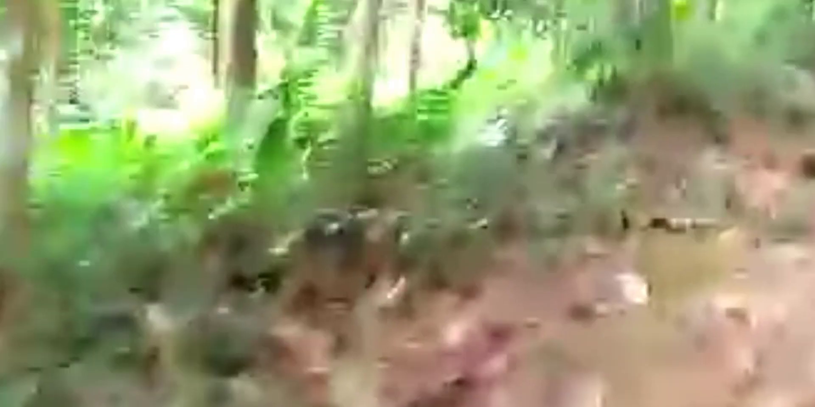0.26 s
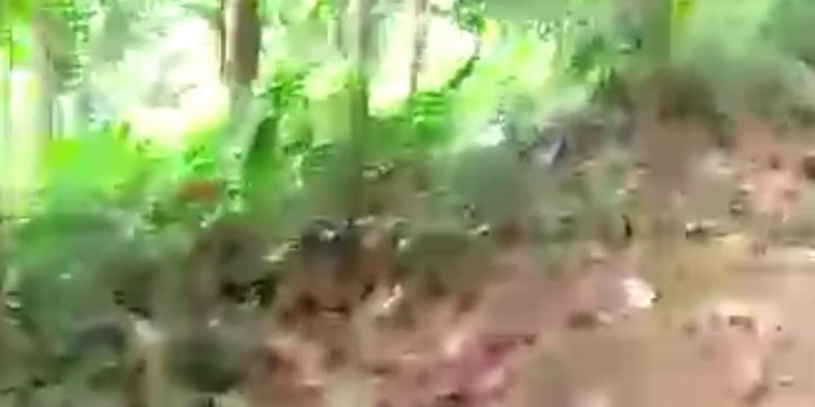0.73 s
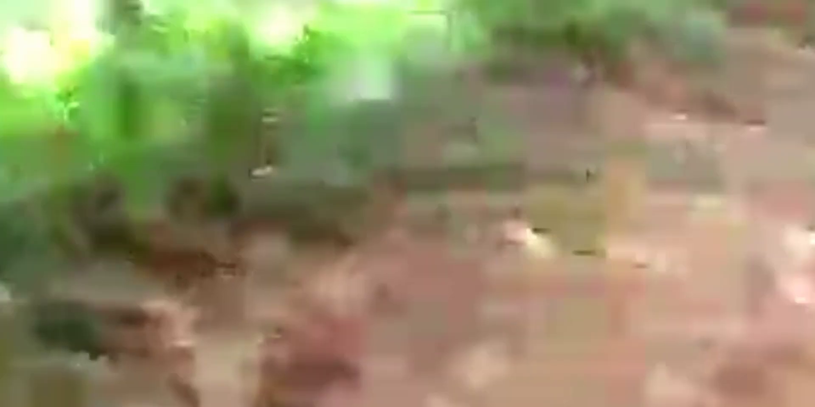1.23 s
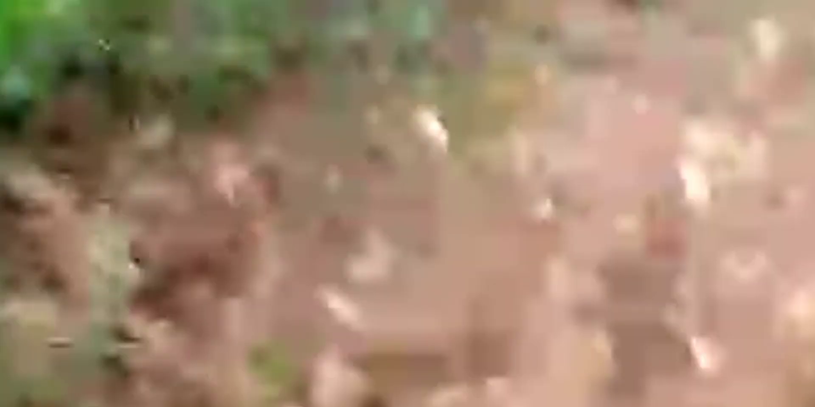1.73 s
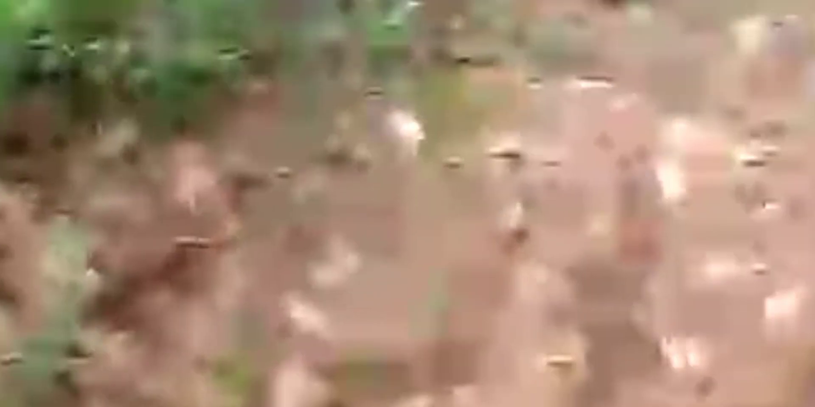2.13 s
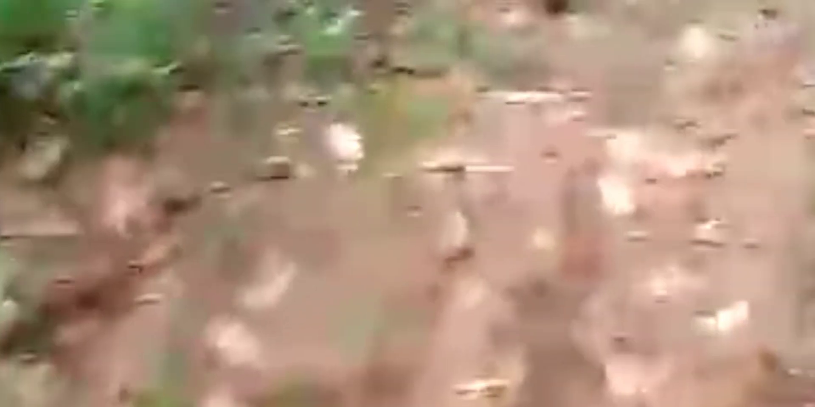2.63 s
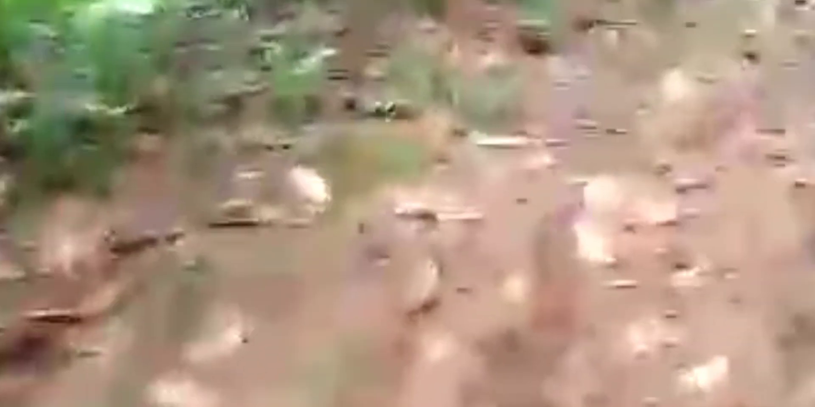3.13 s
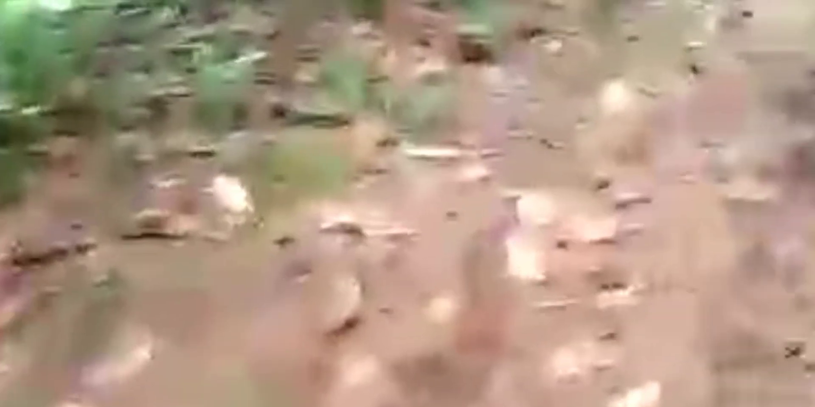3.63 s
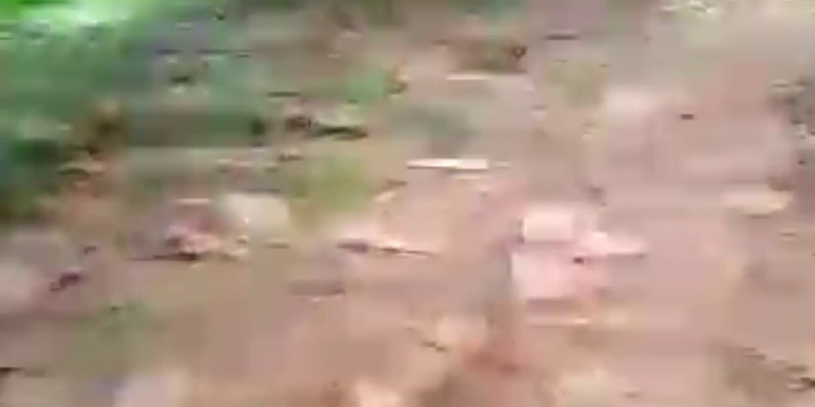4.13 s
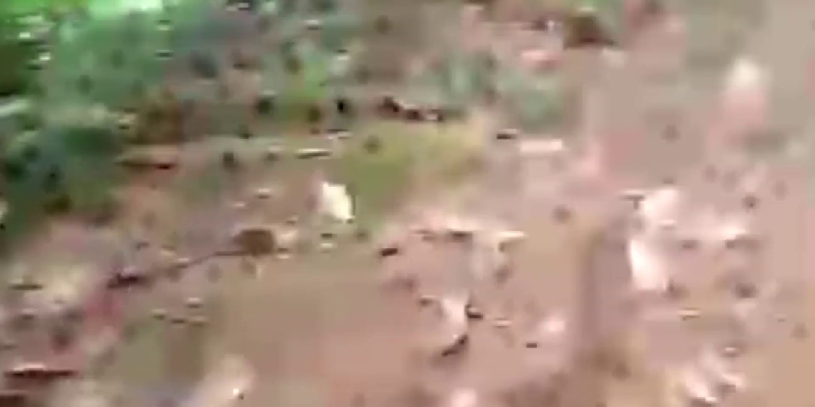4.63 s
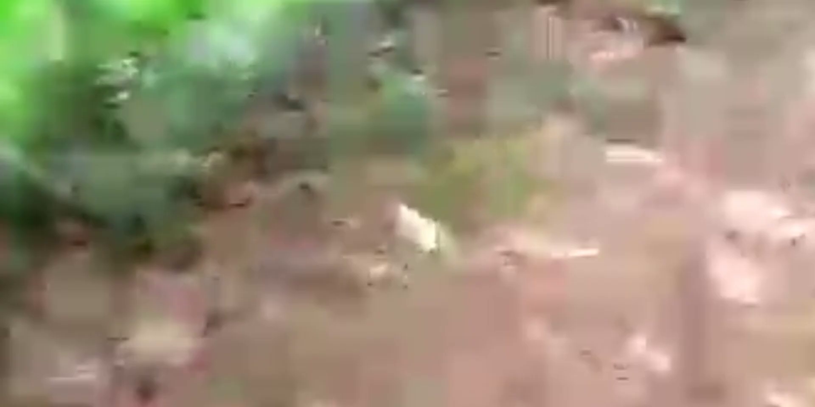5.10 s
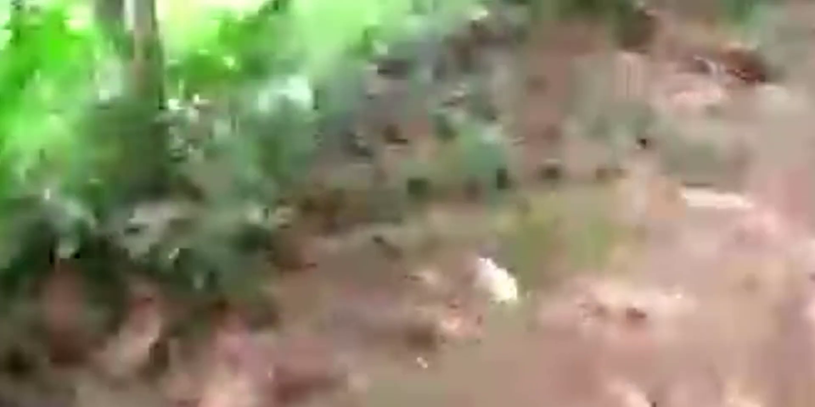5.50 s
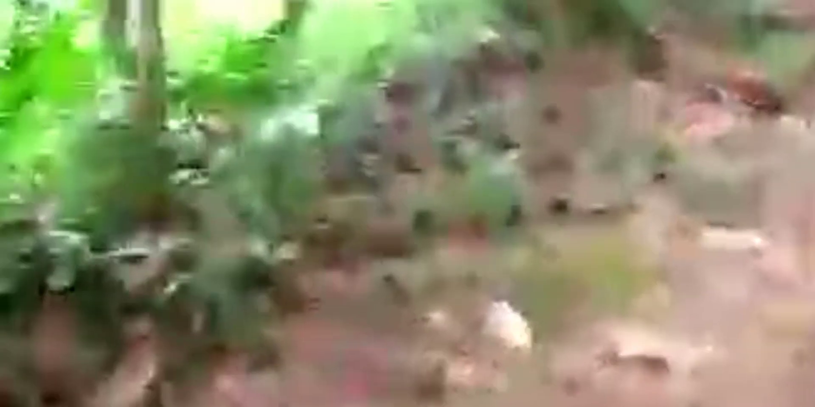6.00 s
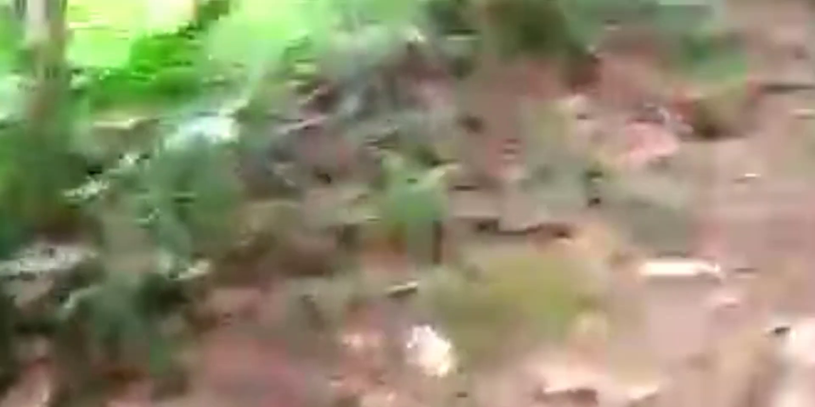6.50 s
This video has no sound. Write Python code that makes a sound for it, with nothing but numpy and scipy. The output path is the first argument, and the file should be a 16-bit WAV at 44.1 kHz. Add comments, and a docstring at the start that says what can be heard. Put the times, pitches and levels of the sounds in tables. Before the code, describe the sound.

A bird close on the left slides a loud, long whistle downward. Another on the right repeats short rising whistles that grow louder. Then the first bird gives its falling whistle again as a rapid trill starts on the left. Small birds whistle, chip and chirr further off throughout. The calls echo lightly among the trees of a garden slope, in stereo, over a soft distant rumble.

```python
"""A bird close on the left slides a long whistle downward, and later does it again.
One on the right repeats rising whistles, growing louder; another on the left trills.
Further off, small birds whistle, chip and chirr, and one slides down far away.
Each call is a gliding tone, roughened by noise where the voice is hoarse. Trunks and a bank on a wooded
garden slope echo it all over a soft distant rumble, heard by two microphones a head apart."""
import sys
import numpy as np
from scipy import signal
from scipy.fft import rfft, irfft
from scipy.io import wavfile
from scipy.ndimage import uniform_filter1d

SR = 44100
rng = np.random.default_rng(int(sys.argv[2]) if len(sys.argv) > 2 else 0)


def transcribe(signal):
    """Save signal, clipped to [-1, 1], as a 16-bit WAV file at the path in sys.argv[1]."""
    frames = np.atleast_2d(signal).T
    limited = np.clip(frames, -1, 1)
    pcm = np.round(limited * 32767).astype(np.int16)
    wavfile.write(sys.argv[1], SR, pcm)


N = 297675
LEAD = SR // 2  # extra samples at the front, for calls that begin before time zero


def undb(db):
    """Turn decibels into a factor to multiply a sound by."""
    return 10 ** (np.asarray(db) / 20)


def on_log(hz, table):
    """Read between the rows of a (pitch_hz, value) table, with octaves evenly spaced."""
    pitches, values = np.transpose(table)
    return np.interp(np.log(np.maximum(hz, 1)), np.log(pitches), values)


def phase_of(hz):
    """Add up a changing pitch into the angle of its wave, in radians."""
    return 2 * np.pi * np.cumsum(hz) / SR


def blur(n, width_hz):
    """Complex noise of strength 1; multiplying a tone by it smears the pitch over width_hz."""
    noise = rng.standard_normal(n + 2000) + 1j * rng.standard_normal(n + 2000)
    lowpass = signal.butter(2, np.clip(width_hz / 2, 3, 5000), fs=SR, output="sos")
    noise = signal.sosfilt(lowpass, noise)[2000:]  # skip the part where the filter settles
    return noise / np.sqrt(np.mean(abs(noise) ** 2))


def place(bus, start_s, sound, pan_db, wood_db, lean=0.13, ear_lag_s=.0008):
    """Send a call to the microphones (rows 0, 1), the nearer one first, and into the wood (rows 2, 3)."""
    lag_s = ear_lag_s * np.clip(np.mean(pan_db) / 4, -1, 1) / 2  # pan_db is left minus right
    lean_db = lean * pan_db / 2  # the wood rings a little louder on the bird's side
    paths = [(-lag_s, pan_db / 2), (lag_s, -pan_db / 2), (0, wood_db + lean_db), (0, wood_db - lean_db)]
    for row, (shift_s, db) in enumerate(paths):
        i = LEAD + int((start_s + shift_s) * SR)
        part = (sound * undb(db))[:bus.shape[1] - i]
        bus[row, i:i + len(part)] += part


def rumble_and_leaves(level_db=-54, flicker_db=.8):
    """Distant rumble and leaf hiss: alike left and right in the bass, drifting a little band by band."""
    # How strong the noise is from bass to treble: pitch_hz, relative_db
    noise_shape = [(12, -77.5), (25, -18.5), (58, -11), (170, 0), (260, 0), (420, -5), (600, -5),
                   (1000, -8), (1860, -10), (2900, -13), (4500, -18), (7000, -28.5), (10000, -31.5),
                   (16000, -29.5)]
    # How alike the two sides are: pitch_hz, likeness (0 unrelated, 1 the same)
    side_likeness = [(60, 0.93), (130, 0.93), (290, 0.67), (640, 0), (1400, 0.034)]
    hz = np.fft.rfftfreq(N, 1 / SR)
    alike = np.clip(on_log(hz, side_likeness), -1, 1)
    mid, side = (rfft(rng.standard_normal(N)) * undb(on_log(hz, noise_shape)) for _ in range(2))
    both = np.sqrt(1 + alike) * mid + np.sqrt(1 - alike) * side * np.array([[1], [-1]])
    noise = 0
    for centre_hz in 20 * 2. ** np.arange(11):
        share = np.clip(1 - abs(np.log2(np.maximum(hz, 20) / centre_hz)), 0, 1)
        drift = np.interp(np.arange(N), np.linspace(0, N, 30), rng.standard_normal(30))
        noise = noise + irfft(both * share, N) * undb(flicker_db * drift)
    return noise * undb(level_db) / np.sqrt(np.mean(noise.mean(axis=0) ** 2))


def trunk_echoes(calls, onset_s=.01):
    """Countless trunks scatter the calls into a fading wash, different on each side, shortest up high."""
    # How long the wood takes to fade by 60 dB: pitch_hz, fade_s
    fade_times = [(500, 0.59), (1500, 1.45), (2800, 0.99), (5000, 0.96), (9000, 0.22)]
    t = np.arange(int(1.5 * SR)) / SR
    tail = 0
    for hz in 400 * 2. ** np.arange(5):
        octave = signal.butter(2, [hz, 2 * hz], "band", fs=SR, output="sos")
        band = signal.sosfilt(octave, rng.standard_normal((2, len(t))))
        fade_s = on_log(hz * np.sqrt(2), fade_times)
        tail = tail + band * np.exp(-np.log(1000) * t / fade_s) * (1 - np.exp(-t / onset_s))
    return signal.fftconvolve(calls, tail * undb(-34.5), axes=1)[:, :calls.shape[1]]


def branch_and_bank_echoes(calls, scatter_db=-35, fade_s=.25):
    """The calls plus scatter from nearby branches and echoes off the bank, all from the bird's side."""
    # Echoes off the bank: delay_s, level_db
    bank_echoes = [(.043, -16), (0.089, -27.5)]
    t = np.arange(SR // 3) / SR
    tail = rng.standard_normal(len(t)) * undb(scatter_db) * np.exp(-np.log(1000) * t / fade_s)
    tail[0] = 1  # the call itself
    for delay_s, db in bank_echoes:
        tail[int(delay_s * SR)] += undb(db)
    return signal.fftconvolve(calls, tail[None], axes=1)[:, :calls.shape[1]]


def small_notes(bus, notes, clear, peak_at, round_off):
    """Straight glides, partly smeared by an unsteady voice; each swells until the fraction peak_at."""
    for start_s, length_s, from_hz, to_hz, blur_hz, db, pan_db in notes:
        progress = np.arange(0, 1, 1 / (length_s * SR))
        core = clear * np.exp(-blur_hz / 150)  # the wider the smear, the less clear tone is left
        voice = core + np.sqrt(np.clip(1 - core ** 2, 0, 1)) * blur(len(progress), blur_hz)
        ramp = np.clip(np.minimum(progress / peak_at, (1 - progress) / (1 - peak_at)), 0, 1)
        swell = np.sin(np.pi / 2 * ramp) ** round_off
        tone = np.exp(1j * phase_of(from_hz + (to_hz - from_hz) * progress))
        place(bus, start_s, 1.836 * undb(db) * swell * (voice * tone).real, pan_db, wood_db=0)


def whistles_and_chips(bus, down_s=.009, up_s=.017):
    """Small birds further off give thin notes, clear to hoarse, and chips whose pitch draws a quick V."""
    # Thin notes: start_s, length_s, from_hz, to_hz, blur_hz, level_db, pan_db
    thin_notes = [(0.2, 0.36, 1820, 1785, 20, -49.5, 2), (0.385, 0.063, 3355, 3030, 27, -45, 2.5),
                  (0.441, 0.12, 3020, 3000, 56, -52.5, 10), (0.55, 0.21, 2970, 2910, 35, -49, 8),
                  (1.535, 0.05, 4950, 5480, 250, -59, 1), (1.988, 0.15, 5580, 5700, 480, -58.5, 3),
                  (2.168, 0.077, 5790, 5110, 580, -55, 5), (2.247, 0.12, 3530, 2077, 96, -57, 8),
                  (2.289, 0.17, 4550, 3795, 490, -54, 3), (2.549, 0.19, 4236, 4080, 360, -58.5, 6),
                  (2.936, 0.012, 3780, 3180, 5, -48, 7), (3.019, 0.04, 887, 1575, 27, -57, -2.5),
                  (3.199, 0.051, 2160, 2314, 22, -49, 17), (3.284, 0.032, 1970, 1880, 49, -49.5, 9.5),
                  (3.434, 0.095, 7240, 7180, 750, -58.5, -1.5), (3.52, 0.017, 5430, 4950, 33, -50.5, -1.5),
                  (4.252, 0.48, 3536, 3550, 24, -67, -1.5), (4.52, 0.027, 2080, 2150, 37, -54, 1),
                  (4.554, 0.049, 5440, 5260, 210, -61.5, -3), (4.708, 0.058, 6400, 6230, 220, -65, -1),
                  (4.908, 0.069, 5490, 5160, 93, -59, -10), (4.94, 0.044, 2080, 2125, 24, -63, -0.5),
                  (4.75, 0.08, 7220, 7200, 228, -71, -4), (5.017, 0.059, 3850, 3822, 140, -58, 3),
                  (5.066, 0.035, 7600, 7540, 504, -70, -2.5), (5.151, 0.13, 3790, 3725, 154, -59, 5),
                  (5.3, 0.3, 3708, 3676, 125, -57, 7), (5.147, 0.1, 8100, 8070, 430, -62, 2),
                  (5.158, 0.081, 6560, 6860, 370, -58.5, -4.5), (5.149, 0.058, 5860, 5810, 34, -55.5, -21),
                  (5.33, 0.17, 5610, 5820, 493, -61.5, -0.5), (5.391, 0.12, 5350, 5220, 150, -56, -3.5),
                  (5.677, 0.2, 4460, 4030, 610, -55.5, 6), (5.857, 0.083, 7700, 7400, 1990, -67, 1),
                  (5.93, 0.16, 4160, 4027, 290, -48, 3.5), (5.999, 0.62, 1782, 1765, 63, -66.5, 12.5),
                  (6.2, 0.18, 4180, 4385, 260, -50, 1.5), (6.502, 0.24, 4270, 3950, 280, -52, 6)]
    # Quick chips: start_s, top_hz, bottom_hz, level_db
    chip_notes = [(2.742, 8030, 5690, -51), (2.742, 5260, 4240, -52)]
    down = [(s, down_s, top, low, 0, db - 5, 1.5) for s, top, low, db in chip_notes]
    up = [(s + down_s, up_s, low, low + 2200, 0, db, 1.5) for s, _, low, db in chip_notes]
    small_notes(bus, thin_notes + down + up, clear=0.84, peak_at=0.28, round_off=0.47)


def chirring_bird(bus, blur_hz=1820, sag=0.91, pan_db=2):
    """One small bird's harsh notes, smeared into noise and sagging in pitch."""
    # Chirrs: start_s, length_s, pitch_hz, level_db
    chirr_notes = [(0.88, 0.075, 5300, -59), (1.12, 0.081, 5080, -60), (1.921, 0.066, 6200, -60.5),
                   (2.364, 0.1, 5470, -54.5), (2.97, 0.087, 5990, -61), (3.919, 0.12, 4800, -49.5),
                   (4.138, 0.1296, 4860, -51.5), (5.51, 0.088, 5830, -55.5), (5.849, 0.11, 5390, -53),
                   (6.121, 0.087, 6060, -61)]
    notes = [(s, length, hz, hz * sag, blur_hz, db, pan_db) for s, length, hz, db in chirr_notes]
    small_notes(bus, notes, clear=.1, peak_at=0.17, round_off=0.54)


def slide(bus, times_s, hz, db, beak_db, pan_db, wood_db, rasp_db, rough=0.074, smear_hz=120):
    """A nearly pure gliding whistle; overtones stand out where the throat rings and the beak opens."""
    # How the throat favours overtones: pitch_hz, gain_db
    throat_gains = [(1700, -35.5), (1900, -5.5), (2500, -12.5), (3000, -33.5), (3500, -27), (4300, -20),
                    (5000, -24.5), (6500, -33.5)]
    t = np.arange(times_s[0], times_s[-1], 1 / SR)
    hz, db, beak_db = (uniform_filter1d(np.interp(t, times_s, c), 400) for c in (hz, db, beak_db))
    phase = phase_of(hz * (1 + 0.00699 * blur(len(t), 24).real))  # the pitch wavers slightly
    step_db = -3.5 - 16 * np.clip((hz - 1580) / 100, 0, 1)  # drop per overtone: high notes are purer
    tone = np.exp(1j * phase)
    for k in (2, 3, 4):
        unsteady = .7 + .7 * blur(len(t), 60 * k)  # overtones break up more than the tone
        overtone_db = on_log(k * hz, throat_gains) + (k - 2) * step_db + beak_db
        tone = tone + undb(overtone_db) * unsteady * np.exp(1j * k * phase)
    breath = undb(rasp_db) * blur(len(t), 7000) * np.exp(1j * phase_of(np.full(len(t), 6000.)))
    voice = ((tone + breath) * (1 + rough * blur(len(t), smear_hz))).real
    fade = np.clip(np.minimum(t - times_s[0], times_s[-1] - t) / 0.016, 0, 1)
    shadow = np.clip(hz / 1600, 0, 1) ** 2  # low notes bend round to the far microphone
    place(bus, times_s[0], np.sqrt(2) * fade * undb(db) * voice, pan_db * shadow, wood_db)


def far_sliding_bird(bus):
    """One falling whistle from far off, blurred by the wood."""
    # Points along the whistle: time_s, pitch_hz, level_db
    far_curve = [(5.615, 3720, -61), (5.64, 3486, -54), (5.7, 3248, -53.5), (5.8, 3134, -57.5),
                 (5.901, 3154, -60.5), (6.16, 2893, -60.5), (6.2, 2350, -63), (6.27, 2190, -62)]
    times_s, hz, db = np.transpose(far_curve)
    beak_db = np.full(len(times_s), -30.)
    slide(bus, times_s, hz, db, beak_db, pan_db=6, wood_db=2, rasp_db=-47, rough=2.1, smear_hz=423)


def rising_bird(bus, low_hz=1468, top_hz=3092, length_s=0.096, echo_s=0.038):
    """Each whistle creeps up, shoots higher and levels off; a trunk across the path throws it back."""
    # Rising whistles, timed as they pass 2000 Hz: time_s, level_db
    rising_notes = [(1.501, -61), (1.71, -57.5), (1.934, -53), (2.16, -50), (2.389, -45.5), (2.623, -45),
                    (2.862, -44), (3.104, -44), (3.353, -43)]
    t = np.arange(0, length_s, 1 / SR)
    loudest_db = max(db for _, db in rising_notes)
    for time_s, db in rising_notes:
        from_hz = low_hz + 21.5 * (loudest_db - db)  # the loudest start lowest
        climb_s = .045 * (top_hz - from_hz) / (top_hz - low_hz)  # a shorter climb is over sooner
        hz = top_hz - (top_hz - from_hz) * np.exp(-(t / climb_s) ** 2)
        start_s = time_s - t[np.argmax(hz > 2000)]
        swell = np.sin(np.pi * t / length_s) ** 0.64 * (hz / top_hz) ** 1.9
        hoarse = abs(1 + 0.8 * blur(len(t), 170))
        call = 2 * undb(db) * swell * hoarse * np.sin(phase_of(hz))
        place(bus, start_s, call, pan_db=-12, wood_db=3.5)
        place(bus, start_s + echo_s, call * undb(-5), pan_db=-2.5, wood_db=-12)


def trilling_bird(bus, start_s=3.63, count=16, gap_s=.1016, slowing_s=.0006):
    """Quick notes start level, flick upward and level off; the pace slows and the trill swells."""
    low_hz, high_hz, length_s = 2295, 2680, .052
    progress = np.arange(0, 1, 1 / (length_s * SR))
    fade = np.sin(np.pi * progress) ** 0.51 * undb(-2 * progress)  # weaker at the top of the flick
    flick_hz = low_hz + (high_hz - low_hz) * np.sin(np.pi / 2 * progress ** 1.24) ** 2
    for k, (pitch_jitter, level_jitter) in enumerate(rng.standard_normal((count, 2))):
        since_s = k * gap_s + k * (k - 1) / 2 * slowing_s
        db = -36 - 5 * np.exp(-since_s / 0.43) + .8 * level_jitter  # starts 5 dB below full level
        tone = np.sin(phase_of(flick_hz * (1 + 0.0059 * pitch_jitter)))
        place(bus, start_s + since_s, undb(db) * fade * tone, pan_db=9, wood_db=3.5)


def second_voice(bus, from_hz=1690, to_hz=855, fall_s=.09, hold_s=0.097, fade_s=.15):
    """The second side of the near bird's voice box joins briefly below each long whistle."""
    # Short lower notes: start_s, level_db
    lower_notes = [(-.17, -42), (3.549, -41.5)]
    t = np.arange(0, hold_s + fade_s, .005)
    hz = to_hz + (from_hz - to_hz) * np.exp(-t / fall_s)
    fade_db = -17 * np.clip(t - hold_s, 0, 1) / fade_s
    beak_db = np.full(len(t), -30.)
    for start_s, db in lower_notes:
        slide(bus, start_s + t, hz, db + fade_db, beak_db, pan_db=12.5, wood_db=-1.5, rasp_db=-44)


def near_sliding_bird(bus):
    """Two long falling whistles close on the left; the first is already under way at time zero."""
    # One list of points per whistle: time_s, pitch_hz, level_db, beak_db (higher is more open)
    whistle_curves = [
        [(-.37, 2900, -38, 4), (-.07, 1964, -36, 3), (.098, 1695, -29.5, -2), (.2, 1501, -32.5, -9),
         (.235, 1410, -33.5, 4.5), (.29, 1287, -39, 9), (.364, 910, -42, 11), (.421, 849, -46.5, -1),
         (.738, 688.4, -52.5, 0), (.82, 645, -66, -7)],
        [(3.27, 2980, -58, 9), (3.319, 2630, -49.5, 3.5), (3.53, 2201, -39, -5), (3.573, 1979, -35.5, -1),
         (3.68, 1806, -32, -3), (3.76, 1686, -33, -16), (3.81, 1587, -31.5, -3.5), (3.94, 1391, -31, -7),
         (3.996, 1313, -32.5, -21), (4.161, 839.6, -43.5, -12), (4.4, 724, -61, -12)],
    ]
    for curve, wood_db, rasp_db in zip(whistle_curves, (3, 1), (-38.5, -48)):
        slide(bus, *np.transpose(curve), pan_db=20, wood_db=wood_db, rasp_db=rasp_db)
    second_voice(bus)


def scene():
    """All the birds and their echoes, over the rumble and leaf hiss."""
    bus = np.zeros((4, LEAD + N))
    near_sliding_bird(bus)
    far_sliding_bird(bus)
    rising_bird(bus)
    trilling_bird(bus)
    whistles_and_chips(bus)
    chirring_bird(bus)
    birds = branch_and_bank_echoes(bus[:2]) + trunk_echoes(bus[2:])
    return birds[:, LEAD:] + rumble_and_leaves()


def record(dry):
    """A steep filter cuts the treble above 15760 Hz."""
    return signal.sosfilt(signal.ellip(10, .2, 80, 15760, fs=SR, output="sos"), dry)


dry = scene()
out = record(dry)
transcribe(out)
```